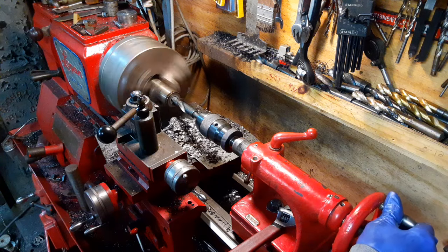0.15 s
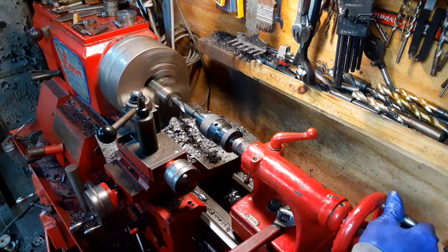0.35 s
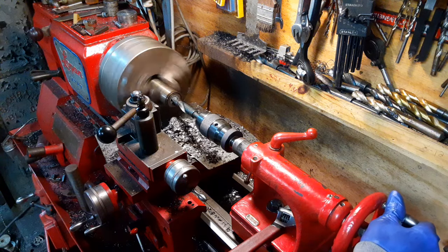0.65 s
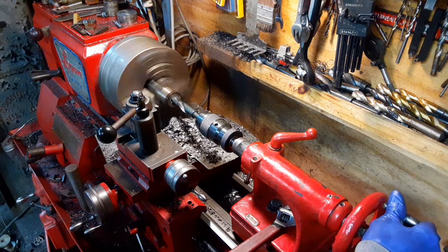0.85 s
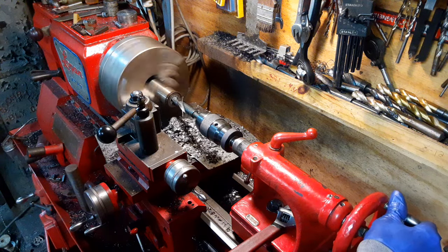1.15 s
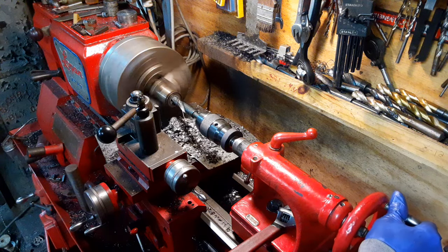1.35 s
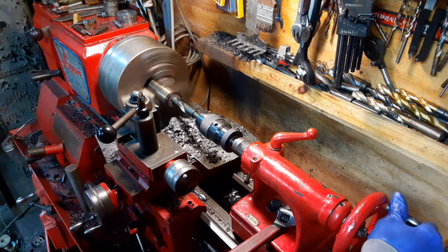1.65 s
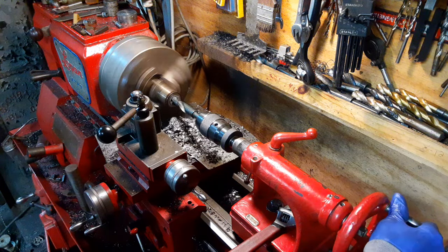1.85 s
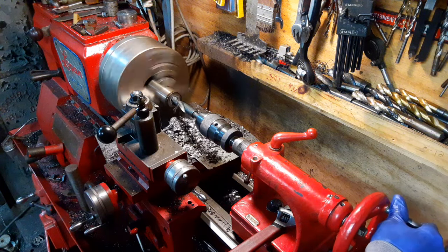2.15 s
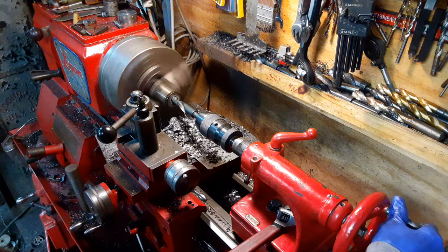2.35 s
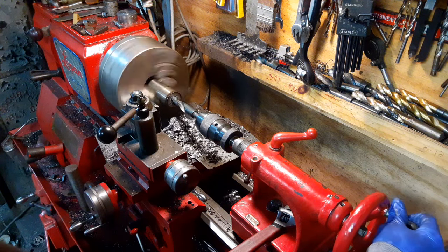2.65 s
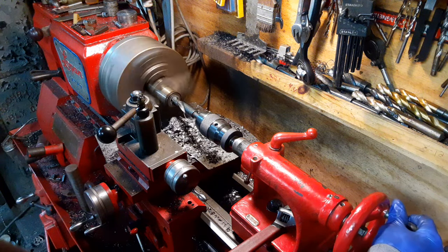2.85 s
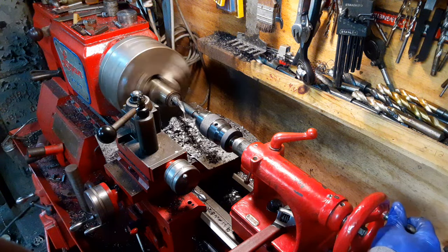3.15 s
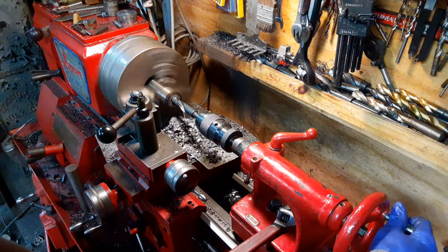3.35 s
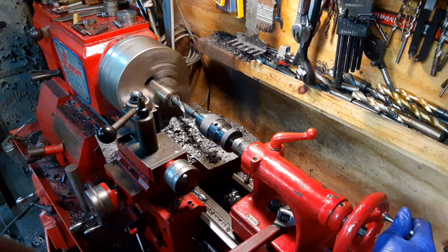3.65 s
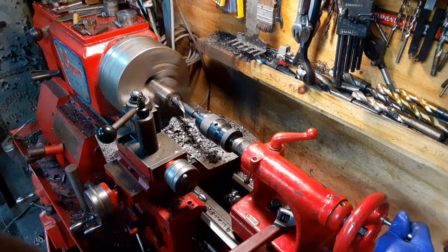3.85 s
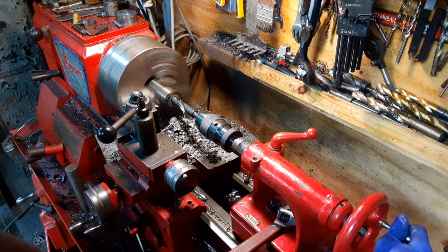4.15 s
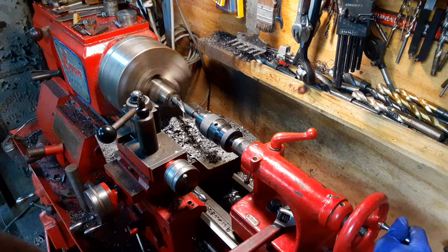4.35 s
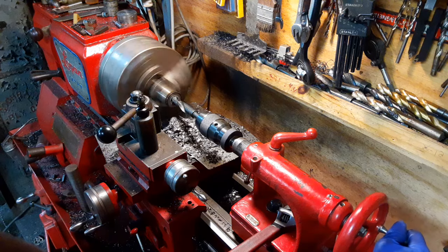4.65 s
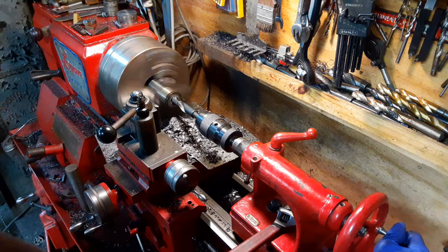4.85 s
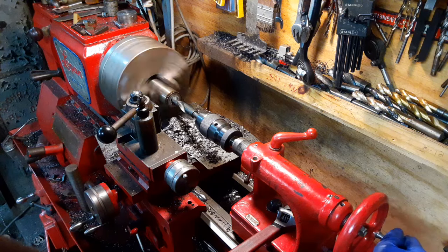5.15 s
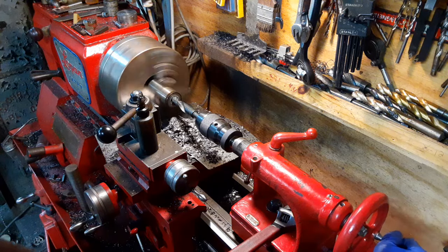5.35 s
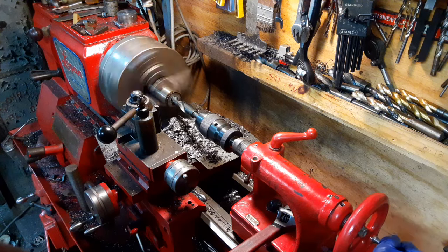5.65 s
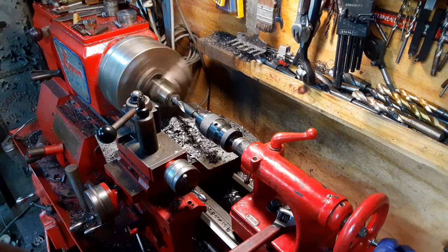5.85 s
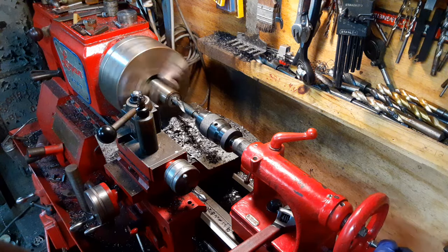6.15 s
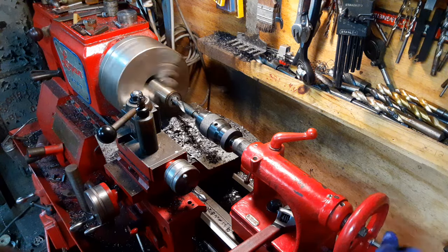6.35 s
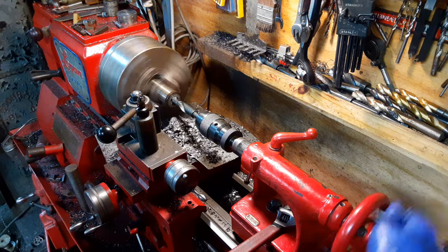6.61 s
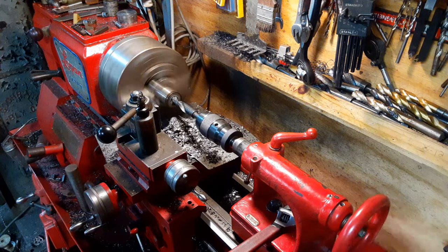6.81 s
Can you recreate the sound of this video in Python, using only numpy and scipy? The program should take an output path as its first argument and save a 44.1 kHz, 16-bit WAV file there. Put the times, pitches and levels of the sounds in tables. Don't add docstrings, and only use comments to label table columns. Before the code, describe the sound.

In a small workshop a metal lathe hums and rumbles steadily while a dull drill bit squeals loudly against a spinning bar. The shrill tone throbs very fast, with bright hissing rasp and brief uneven dips as the bit slips. Near the end the squeal cuts off, the bit scrapes out hollowly, and the motor seems louder. Close stereo microphone with short room echo.

```python
import sys
import numpy as np
from scipy import signal
from scipy.fft import rfft, irfft, next_fast_len
from scipy.io import wavfile
from scipy.ndimage import uniform_filter1d, map_coordinates

SR = 44100
rng = np.random.default_rng(int(sys.argv[2]) if len(sys.argv) > 2 else 0)


def unload_wav(signal):
    wavfile.write(
        sys.argv[1],
        SR,
        np.round(np.clip(np.atleast_2d(signal).T, -1, 1) * 32767).astype(np.int16),
    )


def invert_db(x):
    u = np.asarray(x, float) / 20
    return 10 ** u


N = 307818
TIME = np.arange(N) / SR


def unit(x):
    return x / np.sqrt(np.mean(x ** 2) + 1e-20)


def along(points, hz):
    f, value = np.transpose(points)
    return np.interp(np.log(hz + 1), np.log(f + 1), value)


def curves(rows):
    s, *columns = np.transpose(rows)
    return [np.interp(TIME, s, column) for column in columns]


def wobble(rate):
    knots = rng.standard_normal(6000)
    return map_coordinates(knots, [TIME[::8] * rate]).repeat(8)[:N]


def resonance(hz, center, width):
    return 1 / (1 + (2 * (hz - center) / width) ** 2)


def humps(modes, hz):
    return sum(db * resonance(hz, center, width) for center, width, db in modes)


# [f/Hz, likeness from -1 to 1]
ALIKE = [(60, 0.97), (180, 1), (550, 0.57), (1650, 0.1), (4970, 0.11), (15000, -0.66)]
# [f/Hz, left minus right level/dB]
LEAN = [(60, 0.5), (180, 0.0), (550, 2.5), (1650, 1.0), (4970, 2.0), (15000, -6.0)]


def rush(gain, patchy_db):
    z = signal.stft(rng.standard_normal((2, N)), nperseg=512)[2]
    patches = uniform_filter1d(rng.standard_normal(z.shape[1:]), size=5, axis=0)
    patches = unit(uniform_filter1d(patches, size=10, axis=1))
    pair = signal.istft(z * invert_db(patchy_db * patches), nperseg=512)[1][:, :N]

    m = next_fast_len(N)
    hz = np.fft.rfftfreq(m, 1 / SR)
    turn = np.arccos(np.clip(along(ALIKE, hz), -1, 1)) / 2
    mid, side = rfft(pair, m) * gain(hz) * [np.cos(turn), np.sin(turn)]
    lean = invert_db(along(LEAN, hz) / 2)
    both = irfft(np.array([(mid + side) * lean, (mid - side) / lean]), m)[:, :N]
    return both / np.sqrt(np.mean(both.mean(0) ** 2))


def room(x, t60):
    t = np.arange(SR // 2) / SR
    tail = rng.standard_normal((2, len(t))) * invert_db(-60 * t / t60) * (t > .004)
    return signal.fftconvolve(x[None], tail / np.linalg.norm(tail[0]), axes=1)[:, :N]


# [t/s, level/dB]
LOAD = [(0, -27), (.16, -23.5), (.55, -26), (.76, -24), (1.1, -23), (1.24, -26), (1.44, -22), (1.97, -27),
        (2.26, -24.5), (3.23, -25.5), (3.62, -22.5), (3.96, -26.5), (4.42, -23.5), (4.9, -26), (5.89, -26),
        (6.47, -23.5), (6.8, -20), (6.98, -21)]
# [f/Hz, level/dB, left minus right level/dB]
HUM = [
    (71.8, -26, 0),
    (120.06, 0, 0),
    (239.97, -13, .5),
    (360.03, -6, 2.5),
    (479.94, -24, 1),
]
# [f/Hz, level/dB per Hz]
RUMBLE = [(15, -91.5), (30, -78), (45, -46), (60, -15), (100, -13), (130, 8), (172, -11), (200, -6.5),
          (360, 4.5), (520, -42.5), (680, -47), (1140, -120)]
# [f/Hz, width/Hz, level/dB]
CASTING = [(73.6, 28, 10), (195, 21, 9.5), (240.5, 42, 8.5), (269, 6.4, -3), (333.6, 4.8, 9),
           (387.5, 2.2, 15), (430.4, 48, 13.5)]
# [f/Hz, level/dB per Hz]
GEARS = [(60, -53), (260, -19), (440, -10), (680, -17.5), (1150, -16.5), (1450, -24.5), (2500, -19),
         (3600, -27), (5500, -34.5), (8800, -32.5), (9800, -54), (11500, -44.5), (16000, -61.5)]
# [f/Hz, width/Hz, level/dB]
COVER = [(570, 43, 4.5), (744, 13, 7.5), (918, 69, 4), (1023, 29, 6.5), (1650, 340, 5), (2170, 28, 8)]
# [f/Hz, level/dB, wander/Hz]
WHINE = [(744, -14, 5), (1170.3, -16, 2), (1368.9, -16, 2), (2880, -25, 15), (4950, -23, 20)]


def lathe():
    hum_db, = curves(LOAD)
    rumble_db = -9.5 + 0.71 * hum_db + 0.91 * wobble(6)
    gear_db = -34.5 + 0.21 * hum_db
    sides = np.array([[.5], [-.5]])

    hum = np.zeros((2, N))
    for k, (hz, db, lean) in enumerate(HUM):
        level_db = db + lean * sides + 0.13 * k * wobble(3.8)
        hum += invert_db(level_db) * np.sin(2 * np.pi * hz * TIME + rng.uniform(0, 4.72))

    teeth = np.zeros((2, N))
    for hz, db, wander in WHINE:
        phase = 2 * np.pi * np.cumsum(hz + wander * wobble(8)) / SR
        teeth += invert_db(db + 4.4 * wobble(5)) * np.sin(phase + 0.77 * sides)

    rumble = rush(lambda hz: invert_db(along(RUMBLE, hz) + humps(CASTING, hz)), patchy_db=0.0)
    gears = rush(lambda hz: invert_db(along(GEARS, hz) + humps(COVER, hz)), patchy_db=1.02)
    return invert_db(hum_db + 2.0) * hum + invert_db(rumble_db) * rumble + invert_db(gear_db) * (gears + teeth)


# [t/s, level/dB]
WITHDRAW = [(0, -87), (6.4, -87), (6.52, -40), (6.66, -39), (6.72, -30.5), (6.8, -33.5), (6.855, -26),
            (6.9, -34.5), (6.98, -31.5)]
# [f/Hz, width/Hz, level/dB]
BORE = [(290, 160, 13.5), (690, 260, -5), (1010, 240, 1.5), (1760, 480, -3), (2350, 580, -18),
        (4660, 3200, -18)]


def withdraw():
    level_db, = curves(WITHDRAW)

    def hole(hz):
        return sum(invert_db(db) * resonance(hz, center, width) for center, width, db in BORE)

    return invert_db(level_db + 1.8 * wobble(60)) * rush(hole, patchy_db=2)


# [t/s, squeal level/dB, bite of the lips level/dB]
FEED = [(0, -25, 1), (.4, -26, -1.5), (.86, -23.5, 0), (1.38, -24, -0.5), (2.0, -25.5, 2.5),
        (2.44, -23.5, -2.5), (2.6, -24.5, -1), (2.9, -27.5, 2.5), (3.44, -24.5, 0), (3.65, -25, -1.5),
        (3.87, -23.5, 5), (4.22, -25.5, 1), (5.16, -26.5, 3.5), (5.97, -29.5, 1.5), (6.37, -26.5, -3.5),
        (6.66, -29.5, -21), (6.75, -30, -25), (6.87, -69, -12.5)]
# [t/s, depth level/dB, sinking t/s, catching t/s]
SLIPS = [(.23, 6.5, 0.13, 0.078), (0.511, 15, 0.097, 0.063), (.76, 11, 0.19, 0.083), (1.03, 9, 0.2, 0.048),
         (1.172, 8.5, 0.091, 0.19), (1.48, 4.5, 0.097, 0.12), (1.72, 6, 0.075, 0.13),
         (1.972, 10.5, 0.063, 0.06), (2.08, 8, 0.035, 0.26), (2.482, 16.5, 0.032, 0.088),
         (2.999, 15.5, 0.063, 0.076), (3.259, 10, 0.089, 0.21), (3.538, 13, .1, .08),
         (3.72, 8.5, 0.1, 0.062), (3.931, 11.5, .05, .05), (4.022, 7, 0.027, 0.09), (4.15, 8, 0.11, 0.059),
         (4.62, 4.5, 0.29, .06), (4.99, 2.5, 0.33, 0.23), (5.39, 6, 0.24, 0.11), (5.62, 9, 0.052, .11),
         (5.849, 17.5, 0.097, 0.1), (6.129, 20, 0.033, 0.15), (6.61, 17, .04, .04),
         (6.71, 52, 0.025, 0.041)]
# [level over the fundamental/dB, share of bite/dB per dB, share of slip/dB per dB]
OVERTONES = [(1, 0.03, 0.32), (-11.5, 0.07, 0.51), (-7.5, 1, 0.97), (-20, .5, .6), (-22.5, 0.3, .6)]


def cut():
    squeal_db, bite_db = curves(FEED)
    slip_db = np.zeros(N)
    for s, depth_db, sink, catch in SLIPS:
        slip_db += depth_db * np.interp(TIME, [s - sink, s, s + catch], [0, 1, 0])
    levels_db = [squeal_db + db + bite * bite_db - slip * slip_db for db, bite, slip in OVERTONES]
    return squeal_db, slip_db, levels_db


# [t/s, rate of grabs f/Hz]
GRAB_RATE = [(0, 28.44), (.44, 28.18), (1.26, 29.45), (2.0, 27.54), (2.7, 27.72), (2.85, 25.4),
             (3.38, 28.14), (3.71, 34.82), (4.27, 29.45), (4.74, 30.6), (5.31, 26.6), (5.6, 25.43),
             (6.28, 24.87), (6.53, 31.5), (6.66, 38), (6.98, 39)]


def grab(sharpness):
    turns = np.cumsum(curves(GRAB_RATE)[0]) / SR + 0.575
    angle = 2 * np.pi * turns
    skewed = angle - .4 * (1 - np.cos(angle))
    return np.exp(sharpness * (np.cos(skewed) - 1))


# [f/Hz, level/dB per Hz]
RASP = [(3200, -67.5), (4200, -23), (4800, -30), (5500, -27.5), (6200, -10.5), (6800, -15.5), (7300, -19.5),
        (8200, -8), (9000, -9), (9800, -35.5), (11700, -23), (13300, -42), (15000, -43), (16000, -45)]
# [f/Hz, level/dB per Hz]
SPIT = [(1500, -120), (3000, -25), (5000, -2), (9000, -4.5), (10500, -3.5), (12100, 1.5), (13400, -7),
        (14900, 3), (16000, -17)]


def rasp(squeal_db, slip_db, levels_db):
    rub_db = -25 + 0.6 * squeal_db - 0.17 * slip_db
    rub_db = rub_db + 4.8 * grab(sharpness=4.0) + 0.41 * wobble(30)
    rub = rush(lambda hz: invert_db(along(RASP, hz)), patchy_db=1.5)
    spit = rush(lambda hz: invert_db(along(SPIT, hz)), patchy_db=4.5) * grab(sharpness=1.7)
    return invert_db(rub_db) * rub + invert_db(levels_db[3] + 1.5) * spit


# [t/s, f/Hz]
FREE_PITCH = [(0, 2992), (1.5, 2990), (3, 2990), (3.6, 3020), (3.9, 2975), (4.1, 2995), (5.3, 2975),
              (6.2, 3010), (6.45, 3045), (6.65, 3075), (6.98, 3090)]
# [t/s, level/dB]
LOOSEN = [(0, 9), (2.45, 5), (2.56, 10.5), (2.68, 1.5), (2.95, -7), (3.2, 3.5), (3.65, 7.5), (3.8, 0.5),
          (4.9, 5), (5.2, 1.5), (6.2, -11.5), (6.35, -4), (6.5, -16.5), (6.98, -20)]
# [level between grabs/dB, grab sharpness, left level/dB, right level/dB, left lead/rad,
# wall echo left level/dB, wall echo right level/dB, room level/dB]
PARTIALS = [
    (-6, 3.5, 3, -1.5, 2.03, -7, -3, -2.5),
    (-18.5, 5.9, -11.5, 3, 1.6, 9, -20, -7),
    (-25.5, 6.5, -9.5, 4, 0.93, 0, -14.5, -11.5),
    (-15, 4.7, 0, -3.5, 0.56, -4, -12, -16.5),
    (-28, 3, 1, -13.5, 1.1, -24, -3, -4.5),
]


def squeal(slip_db, levels_db):
    hold = grab(sharpness=2.5)
    sag_hz = np.maximum(58.2 - 3.5 * slip_db, 0)
    free_hz, = curves(FREE_PITCH)
    pitch_hz = free_hz - sag_hz * hold + 13 * wobble(70)
    pitch_hz += 25 * np.roll(hold, round(.009 * SR))
    phase = 2 * np.pi * np.cumsum(pitch_hz) / SR + .055 * wobble(500)

    strength_db = 0.71 * np.tanh(wobble(25))
    flutter = invert_db(1.7 * wobble(230))
    loose_db, = curves(LOOSEN)
    out = np.zeros((2, N))
    for k, (rest_db, sharp, left_db, right_db, lead, wall_l, wall_r, room_db) in enumerate(PARTIALS):
        resting = invert_db(rest_db + loose_db + 2.5 * wobble(90))
        flare = grab(sharp) * invert_db(strength_db * (1 + .3 * k) + .9 * wobble(120))
        swell = (resting + flare) * flutter
        swell = swell / np.sqrt(uniform_filter1d(swell ** 2, size=SR // 4)) * invert_db(levels_db[k] + 3.5)

        angle = (k + 1) * phase
        direct = swell * np.sin(angle + np.array([[lead], [0]])) * invert_db([[left_db], [right_db]])
        late = np.pad(direct, ((0, 0), (round(.0072 * SR), 0)))[:, :N]
        wall = late * invert_db([[wall_l], [wall_r]])
        out += direct + wall + invert_db(room_db) * room(swell * np.sin(angle), t60=.2)
    return out


def scene():
    squeal_db, slip_db, levels_db = cut()
    background = lathe() + withdraw()
    return background + rasp(squeal_db, slip_db, levels_db) + squeal(slip_db, levels_db)


def band_limit(x):
    return signal.sosfilt(signal.butter(12, 15830, fs=SR, output="sos"), x)


def record(dry):
    topped = dry / (1 + abs(dry / .7) ** 6) ** (1 / 6)
    fade = np.clip((TIME[-1] - TIME) / 0.0016, 0, 1)
    return band_limit(topped * fade)


dry = scene()
out = record(dry)
unload_wav(out)
```